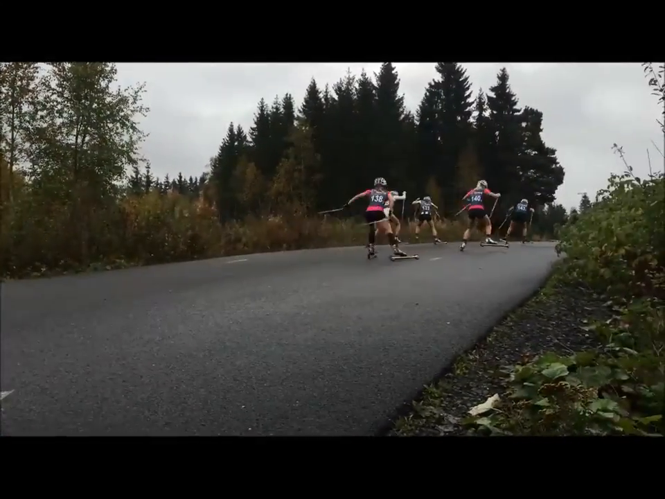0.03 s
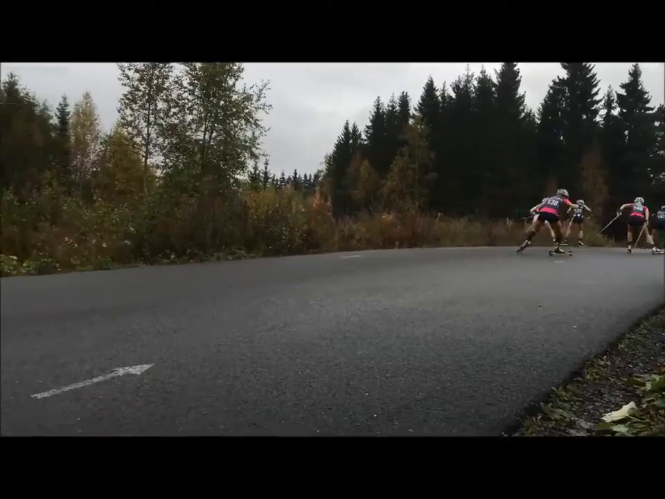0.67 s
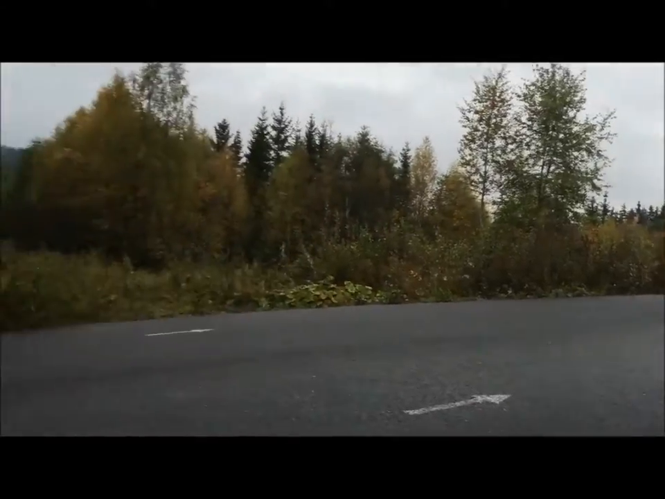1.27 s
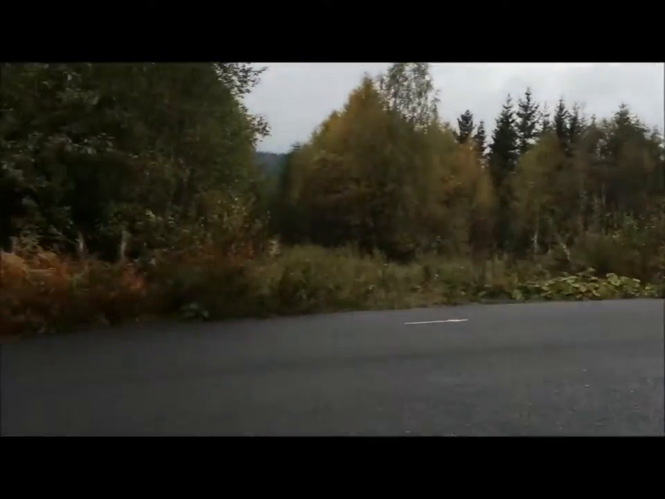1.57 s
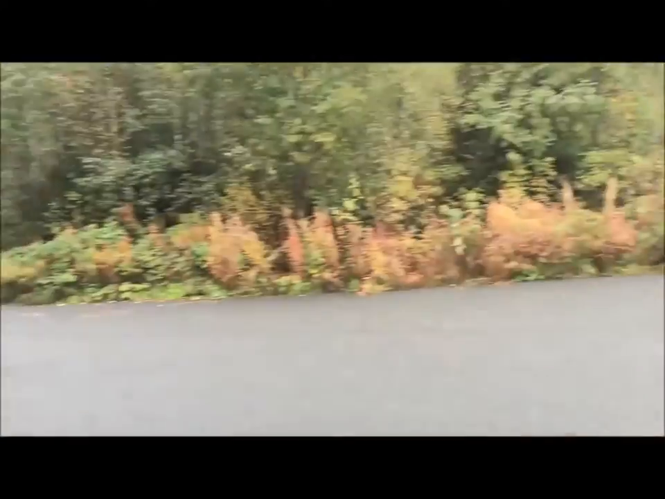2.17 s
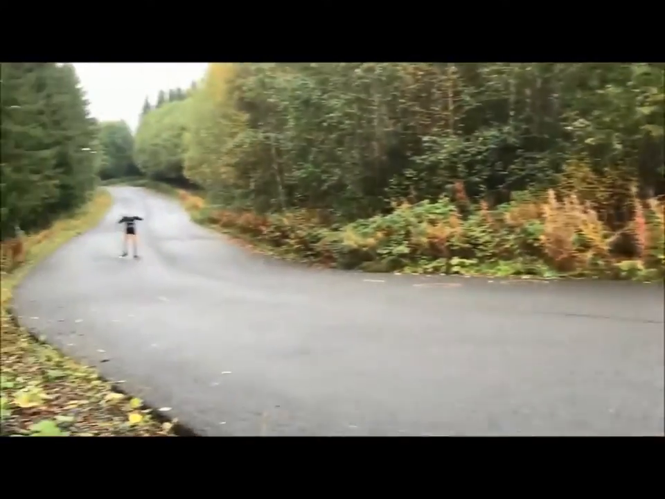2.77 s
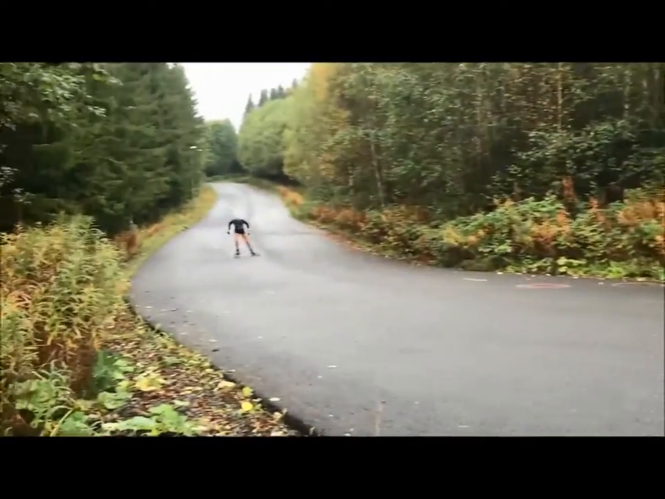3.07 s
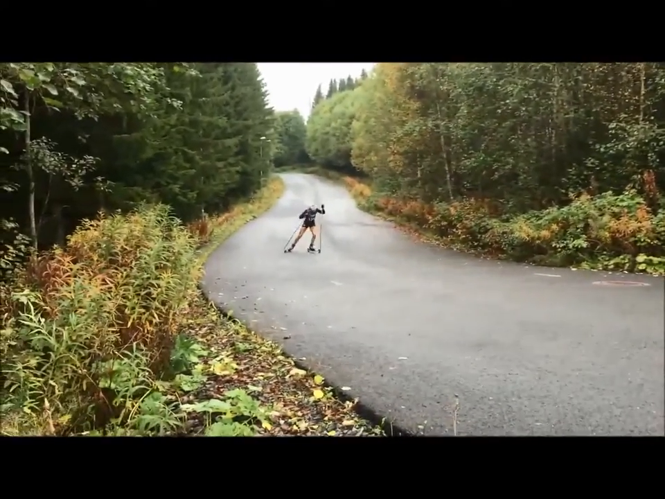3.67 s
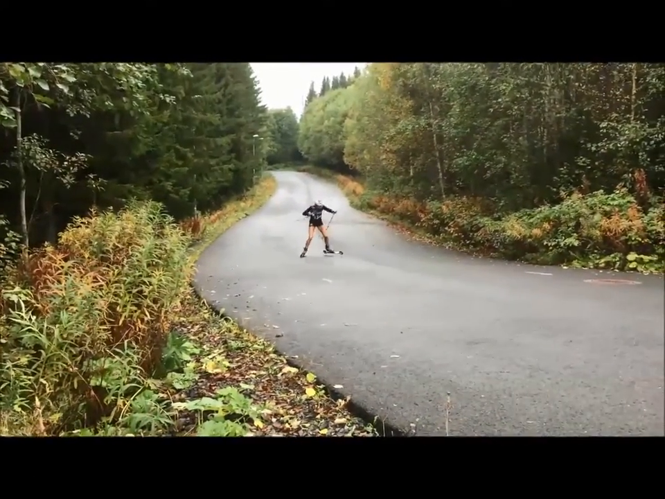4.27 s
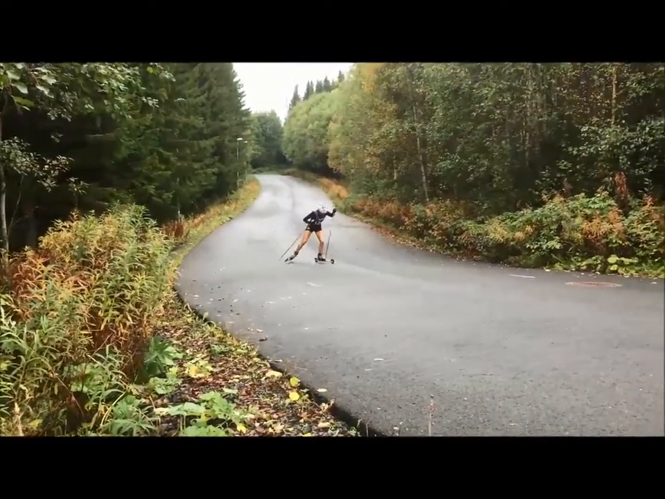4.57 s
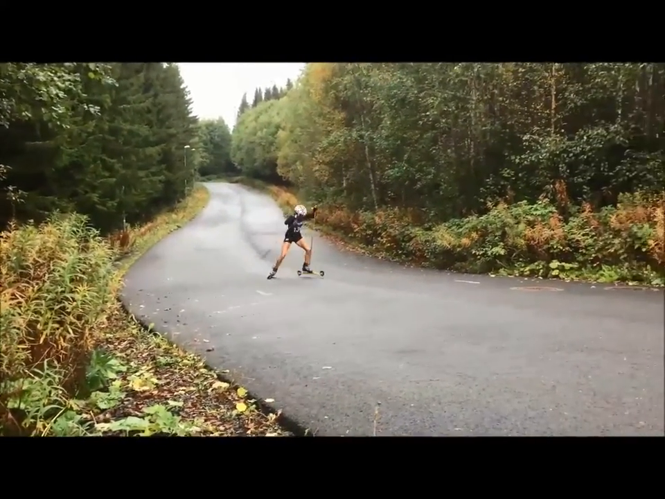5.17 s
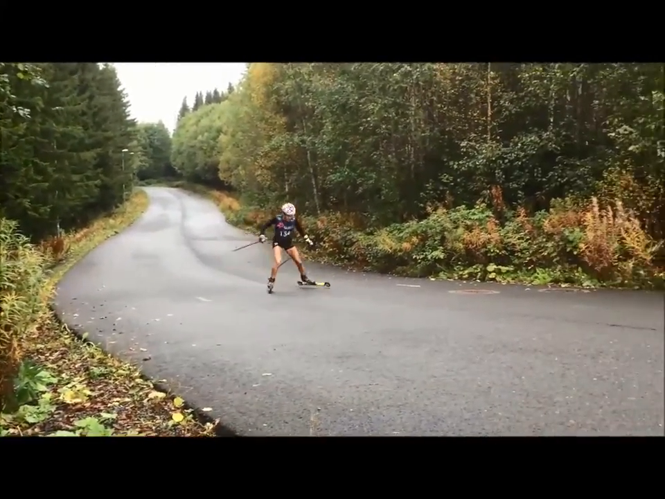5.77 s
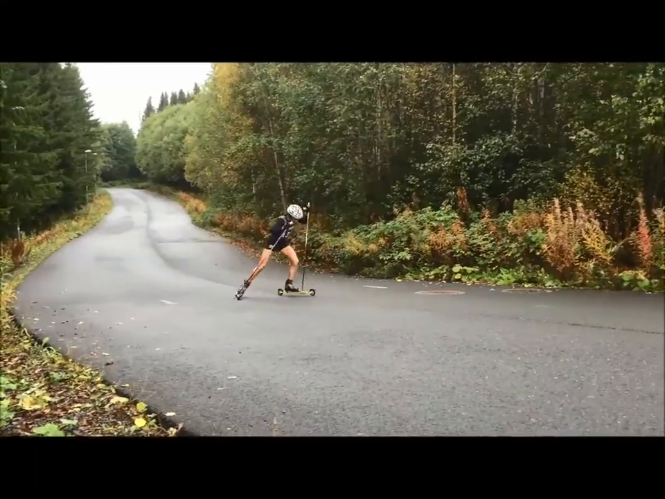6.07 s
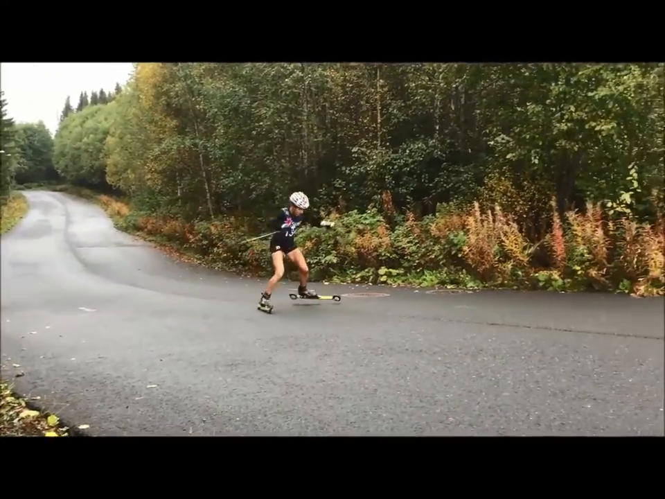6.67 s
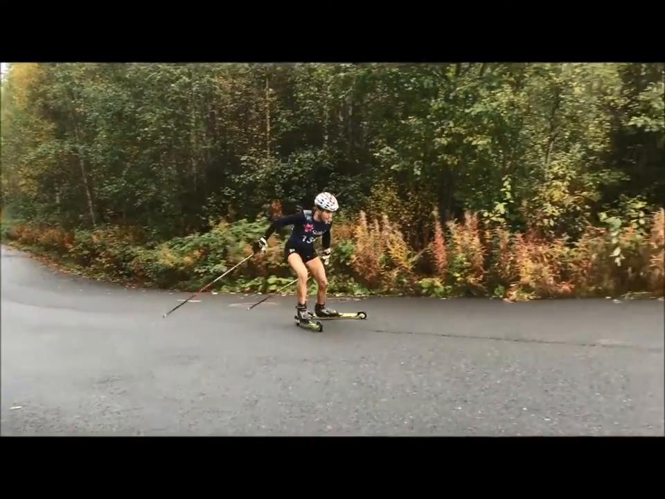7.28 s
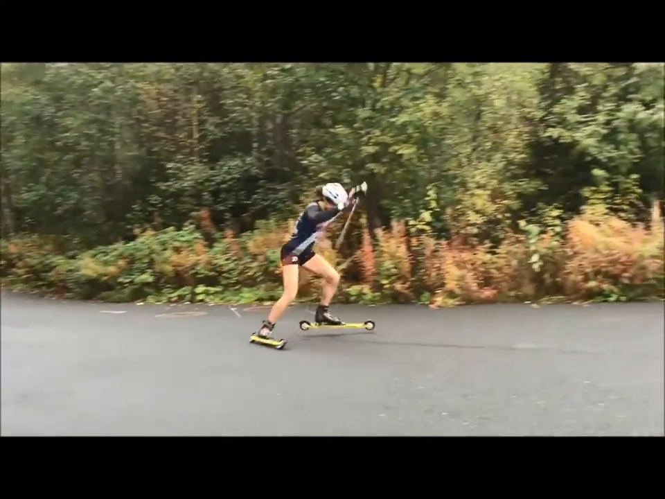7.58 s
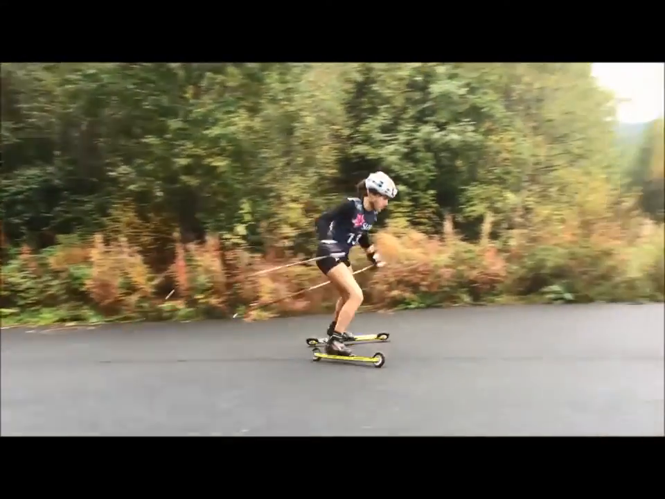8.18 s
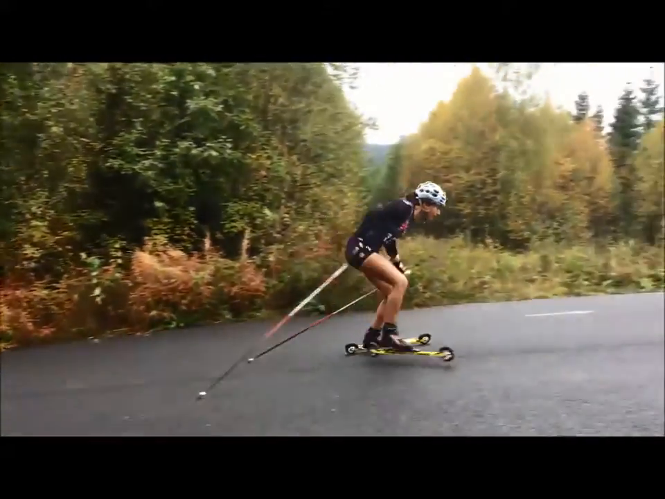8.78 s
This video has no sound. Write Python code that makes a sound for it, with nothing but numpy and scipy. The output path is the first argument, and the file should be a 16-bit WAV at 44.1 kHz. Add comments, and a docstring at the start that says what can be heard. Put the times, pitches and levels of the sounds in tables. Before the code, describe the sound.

A group of roller skiers moves away along a forest road, pole tips clicking and skis slapping in a quick, uneven clatter over the hiss of wheels. The clatter thins, and one skier approaches with evenly spaced pole strikes that echo briefly among the trees. The clicks grow loudest at the end, with short scrapes, a faint whirr and a low puff of air on the roadside microphone.

```python
"""Roller skiers on a forest road

A pack of skiers clatters away over the asphalt, then one skier comes close. Carbide pole tips bite
and skid, skis slap down between the pole plants, and rubber wheels hiss on the road.
The trees echo the clicks, and puffs of air touch the microphone now and then."""
import sys
import numpy as np
from scipy import signal
from scipy.fft import rfft, irfft, next_fast_len
from scipy.io import wavfile
from scipy.ndimage import uniform_filter1d, map_coordinates

SR = 44100
rng = np.random.default_rng(int(sys.argv[2]) if len(sys.argv) > 2 else 0)


def to_wav(s):
    """Save 16-bit WAV."""
    ch = np.atleast_2d(s).T  # columns
    pcm = np.round(np.clip(ch, -1, 1) * 32767)  # PCM
    wavfile.write(sys.argv[1], SR, pcm.astype(np.int16))


N = 393813

# Poles hitting the road. Each row: start in seconds, level in dB, knock (middle tones) in dB,
# sparkle (high tones) in dB, echo level in dB, ping pitch in Hz, knock pitch in Hz.
POLE_PLANTS = [(0.3269, -16.5, 1.5, -5, -42, 3370, 1500), (0.8374, -24.5, 11, -14, -60, 3080, 750),
               (1.0431, -21.5, -8, -2.5, -46, 2270, 1430), (1.6284, -18, -4, -4, -39.5, 3040, 674),
               (2.3335, -19.5, 3, -2.5, -34.5, 3520, 610), (3.0329, -16, -7, 2.5, -33.5, 3330, 1440),
               (3.798, -25.5, 2, 4, -33, 3190, 1400), (4.6354, -20, 3.5, -8.5, -30.5, 3080, 1460),
               (5.413, -20, 3, 4.5, -31.5, 4380, 1400), (6.2009, -21, -3.5, -2, -30, 3260, 1400),
               (7.0113, -17.5, 2, 5, -34, 3250, 1400), (7.805, -12, 4.5, 3.5, -33.5, 3140, 1224),
               (8.5958, -9, -2.5, -2.5, -35, 3840, 1160)]
# The tone of a pole tip. Each row: frequency in Hz, level in dB.
TIP_TONE = [(30, -29), (200, -32.5), (500, -12.5), (1000, -9.5), (2300, -2.5), (3900, -1), (4900, -8.5),
            (6000, -9.5), (7500, -21), (11500, -33.5), (15500, -44)]

def poles():
    """Each plant drives a hard tip into the asphalt, and the forest answers."""
    out = np.zeros(N)
    for start, db, knock_db, sparkle_db, echo_db, ping_hz, knock_hz in POLE_PLANTS:
        pings = [(ping_hz, 260, 8), (knock_hz, 140, 7)]
        click = contact(TIP_TONE, db, knock_db, sparkle_db, pings,
                        chatter_s=0.0034, chatter=2.36, scuff_s=0.00067)
        add(out, start - LEAD_S, click)
        add(out, start, amp(echo_db) * forest_echo(far_db=-9, far_stretch=2.57, lumpiness=0.13))
    return out


# Skis landing. Each row: start in seconds, level in dB, knock in dB, sparkle in dB,
# thump level in dB, ping pitch in Hz.
SKI_LANDINGS = [(0.115, -32.5, 9, 5, -52, 2220), (0.147, -37, 5, -8, -43.5, 1980),
                (0.472, -26.5, 6.5, 5, -48, 3230), (0.863, -29.5, 0, 2, -50, 2630),
                (1.433, -30, -2.5, 15, -46.5, 3640), (1.7125, -21, -10.5, 9.5, -64, 3290),
                (1.799, -35, -1, 10, -52, 2030), (2.161, -45, 18, 3, -61, 2000),
                (2.4058, -22, -7, -2, -56, 3330), (2.77, -43, 14, -5, -54, 3300),
                (2.927, -48.5, 15, 0, -55, 1990), (4.2306, -31.5, 0.5, -12, -59, 3130),
                (5.048, -29.5, 3.5, 0, -52, 3380), (5.8177, -31, 3.5, 0, -51.5, 3200),
                (6.2746, -27.5, 6.5, 10, -52, 2960), (6.633, -31, 7.5, 3, -60, 2570),
                (7.0897, -21.5, -3.5, 3, -51, 2670), (7.4532, -27.5, 9, 5.5, -44, 2080),
                (7.883, -25.5, -0.5, 2, -45, 2440), (8.2336, -23.5, 5.5, 4, -41, 3230),
                (8.6738, -24, 4, 5.5, -40, 3320)]
# The tone of a ski's slap. Each row: frequency in Hz, level in dB.
SKI_TONE = [(25, -28), (80, -12), (150, -1.5), (500, -5.5), (1100, -3), (2300, -0.5), (3700, 0.5),
            (4800, -20), (6300, -24), (8500, -40), (15000, -58)]
# The low notes of a loaded ski. Each row: pitch in Hz, level in dB, seconds to fade by 60 dB.
THUMP_NOTES = [(135.4, -2, 0.094), (161.5, -4.5, 0.21), (217.3, 4, 0.096), (290, -26, .07)]

def skis():
    """A ski lands with a slap, its frame thumps on the rubber wheels, and its binding rattles."""
    out, t = np.zeros(N), np.arange(SR // 4) / SR
    for start, db, knock_db, sparkle_db, thump_db, ping_hz in SKI_LANDINGS:
        knock_hz = rng.uniform(380, 643)
        pings = [(ping_hz, 260, 8), (knock_hz, 90, 5)]
        slap = contact(SKI_TONE, db, knock_db, sparkle_db, pings,
                       chatter_s=0.003, chatter=1.5, scuff_s=0.003)
        add(out, start - LEAD_S, slap)
        add(out, start, amp(db - 22.5) * forest_echo(far_db=-32, far_stretch=1.9, lumpiness=0.24))
        thump = np.zeros(len(t))
        for hz, note_db, fade_s in THUMP_NOTES:
            phase = 2 * np.pi * hz * rng.normal(1, 0.052) * t + rng.uniform(0, 2 * np.pi)
            thump += amp(note_db - 60 * t / fade_s) * np.sin(phase)
        thump *= 1 - np.exp(-t / 0.0053)
        add(out, start, amp(thump_db) * thump / np.std(thump[:SR // 30]))
        for delay_s in rng.uniform(0.012, 0.06, size=2):
            rattle = contact(SKI_TONE, db - 18.5, knock_db, -1, pings,
                             chatter_s=0.0034, chatter=1, scuff_s=0.00033)
            add(out, start + delay_s, rattle)
    return out


# Light taps of tips and bindings. Each row: start in seconds, level in dB, knock in dB, sparkle in dB.
LIGHT_TAPS = [(0.034, -31.5, 1, 12), (0.102, -34, 9, -2), (0.203, -38, 4, -13), (0.243, -33, 5.5, 12.5),
              (0.3134, -27, -0.5, 4), (0.392, -30.5, -5, 9), (0.409, -28.5, -1, 9), (0.457, -29.5, 4, 2),
              (0.485, -31.5, 1, 4), (0.533, -38, 18, -13), (0.6391, -34.5, -1.5, 5), (0.659, -35, 8, -10),
              (0.696, -32, 0, -6), (0.8811, -36.5, 5, 11.5), (0.9078, -32.5, 3, -6), (0.932, -33, 6, 6),
              (0.939, -26.5, -3, 14.5), (1.0103, -31.5, -2, 5), (1.098, -29.5, -0.5, 8),
              (1.135, -30.5, 0.5, -3), (1.3484, -32.5, -8, 5), (1.355, -32.5, -5, 11),
              (1.369, -31.5, -9, 12), (1.4178, -33.5, -4, -3), (1.773, -34, 9, 13), (1.879, -29, .5, 8.5),
              (1.8994, -34.5, -7, 6), (1.986, -43.5, 20, -8), (2.5, -35.5, -20, 3), (2.579, -31, -1, 0),
              (2.5976, -35.5, 5, 5), (3.742, -42.5, -0.5, 1), (3.8142, -30.5, -15, 12),
              (4.2048, -37.5, -18, -4), (4.6282, -27, -2, 4), (6.208, -24.5, 5, 14), (6.586, -40.5, -5, -1),
              (6.703, -41, 9, 11), (7.415, -38, 5.5, -7), (7.812, -21.5, -4, 9), (7.863, -27, -1, 9),
              (8.1697, -38, -2, 22), (8.188, -28.5, -3.5, 2), (8.3217, -38.5, 0.5, -3),
              (8.6, -18.5, -2, -5)]
# The tone of a tap. Each row: frequency in Hz, level in dB.
TAP_TONE = [(25, -17), (200, -3.5), (700, -2), (1200, 2), (2500, 3.5), (3800, 3), (4800, -11.5),
            (6000, -16.5), (8500, -33), (15000, -51)]

def clatter():
    """Tips and bindings tap lightly, each with its own ping, hollow knock and faint echo."""
    out = np.zeros(N)
    for start, db, knock_db, sparkle_db in LIGHT_TAPS + stray_taps():
        ping_hz = 3100 * np.exp(rng.normal(0, 0.18))
        knock_hz = rng.uniform(453, 1250)
        pings = [(ping_hz, 280, 6), (knock_hz, 100, 7)]
        tap = contact(TAP_TONE, db, knock_db, sparkle_db, pings,
                      chatter_s=0.0058, chatter=1.87, scuff_s=0.0015)
        add(out, start - LEAD_S, tap)
        add(out, start, amp(db - 20.5) * forest_echo(far_db=-33, far_stretch=1.6, lumpiness=0.092))
    return out


def stray_taps(step_s=0.02, pack_gone_s=1.65, knock_db=1.5, sparkle_db=-8):
    """Rows of faint random taps: many while the pack is near, few after it."""
    times = np.arange(0, N / SR, step_s)
    chance, scatter = rng.random(len(times)), rng.standard_normal(len(times))
    taps_per_s = np.where(times < pack_gone_s, 7, 2)
    db = at_time(GLIDE_LEVEL, times) + 4 + 2 * scatter
    return [(times[i], db[i], knock_db, sparkle_db) for i in np.flatnonzero(chance < taps_per_s * step_s)]


# Where a pole shaft rings. Each row, as for the pings: pitch in Hz, width in Hz, boost in dB.
SHAFT_RINGS = [(1760, 190, 5), (3230, 970, 6), (4400, 180, 4.5)]
LEAD_S = 0.006  # the scuff begins this long before the bite

def contact(tone, level_db, knock_db, sparkle_db, pings, chatter_s, chatter, scuff_s):
    """One hard hit: a growing scuff, a sharp bite, then chatter on the stones."""
    t = np.arange(SR // 20) / SR - LEAD_S
    pressure = np.exp(-np.abs(t) / np.where(t < 0, scuff_s, chatter_s))
    stones = pressure * rng.standard_normal(len(t)) * np.exp(0.38 * rng.standard_normal(len(t)))
    force = chatter * stones / np.linalg.norm(stones)
    force[round(LEAD_S * SR)] += 1  # the bite
    # The force's broad tone is taken out, so the struck parts set the tone and chatter only ripples it.
    broad_db = 10 * np.log10(uniform_filter1d(np.abs(rfft(force)) ** 2, size=70) + 1e-9)
    grid_hz = np.fft.rfftfreq(len(t), 1 / SR)
    tilt = [(150, 0), (550, knock_db), (1100, knock_db), (1900, 0), (4000, 0), (5800, sparkle_db)]

    def gain_db(hz):
        struck_db = at_hz(tone, hz) + ring_db(SHAFT_RINGS, hz) + ring_db(pings, hz)
        return struck_db + at_hz(tilt, hz) - np.interp(hz, grid_hz, broad_db)

    click = shape_tone(force, gain_db)
    # The click gets as much energy as 12 ms of steady sound at level_db.
    return amp(level_db) * click * np.sqrt(0.012 * SR) / np.linalg.norm(click)


# Tips and edges skidding. Each row: middle in seconds, half length in seconds, level in dB.
TIP_SKIDS = [(0.103, 0.012, -37), (0.263, 0.013, -38.5), (0.331, 0.019, -31), (0.674, .008, -38.5),
             (0.964, 0.018, -39), (1.406, .012, -36.5), (1.646, .012, -34), (1.69, 0.0085, -34),
             (4.684, 0.05, -40.5), (5.463, .023, -33), (6.248, .031, -35), (7.075, 0.022, -31),
             (7.871, 0.019, -31.5), (8.228, 0.015, -34), (8.655, 0.016, -28)]

def skids(grains_per_s=1500):
    """A loaded tip skips over grains of grit."""
    t = np.arange(N) / SR
    pressure = sum(amp(db) * np.exp(-0.5 * ((t - middle) / half) ** 2) for middle, half, db in TIP_SKIDS)
    treble_cut = [(4000, 0.5), (6000, -6)]  # subtracted below, so the highest tones come out brighter
    scrape = shape_tone(grit(grains_per_s),
                        lambda hz: at_hz(TAP_TONE, hz) + ring_db(SHAFT_RINGS, hz) - at_hz(treble_cut, hz))
    return pressure * unit(scrape)


# Skating pushes. Each row: time of full weight in seconds, seconds held, roar in dB, sizzle in dB.
SKATING_PUSHES = [(.62, .06, -45, -84), (.98, 0.043, -43, -51), (1.93, 0.047, -45.5, -73),
                  (2.5, 0.17, -43.5, -65), (3.22, 0.15, -43.5, -61), (3.92, 0.04, -46.5, -62),
                  (4.34, 0.08, -49.5, -68.5), (5.03, 0.1, -45.5, -66), (5.7, 0.19, -45.5, -67),
                  (6.33, 0.042, -45.5, -70), (6.65, 0.029, -45, -64), (7.18, 0.15, -46, -67),
                  (7.47, 0.035, -44, -74), (8, .04, -51, -69.5), (8.28, 0.052, -48.5, -72),
                  (8.74, 0.11, -48.5, -70)]
# How loud the gliding wheels and their rumble are. Each row: time in seconds, level in dB.
GLIDE_LEVEL = [(0, -43.5), (.45, -44.5), (1.25, -43.5), (1.5, -48.5), (1.8, -45.5), (2.35, -54),
               (3.7, -56.5), (4.2, -51), (6.1, -55), (7.1, -50), (8.93, -50)]
RUMBLE_LEVEL = [(0.0, -59), (0.25, -57), (3.43, -64), (6.79, -62.5), (7.19, -54), (7.68, -63),
                (8.08, -58.5), (8.45, -61.5), (8.93, -49)]
# The tones of the three wheel noises. Each row: frequency in Hz, level in dB.
ROAR_TONE = [(100, -10.5), (300, -10.5), (480, -3.5), (720, -7), (1000, -2.5), (1220, -0.5), (1450, -0.5),
             (2200, -1.5), (2700, 2), (3650, -2.5), (4300, -12), (4900, -24.5), (7000, -45.5)]
SIZZLE_TONE = [(3500, -45), (4600, 7.5), (6000, 4.5), (7500, -14), (10000, -29), (15000, -22)]
RUMBLE_TONE = [(15, -57), (28, -27), (48, -12), (75, -3.5), (105, -10), (160, -2), (210, -2.5), (290, -8.5),
               (400, -21), (800, -51.5), (2000, -100)]
# Where wheel and ski frame ring. Each row: pitch in Hz, width in Hz, boost in dB.
FRAME_RINGS = [(1730, 120, 1.5), (3393, 410, 6.5)]

def wheels():
    """Rubber rumbles on rough asphalt and loose grit ticks; each push swells a roar and a damp sizzle."""
    t = np.arange(N) / SR
    roar_power, sizzle_gain = amp(at_time(GLIDE_LEVEL, t)) ** 2, np.zeros(N)
    for full_s, hold_s, roar_db, sizzle_db in SKATING_PUSHES:
        weight = ski_load(full_s, hold_s)
        roar_power += (amp(roar_db) * weight) ** 2
        sizzle_gain += amp(sizzle_db) * weight ** 2.9
    roar_gain, bumps = np.sqrt(roar_power), wobble(90)
    roar = roar_gain * amp(1.05 * bumps) * rush(ROAR_TONE, patchy_db=3.0, rings=FRAME_RINGS)
    sizzle = sizzle_gain * amp(bumps) * rush(SIZZLE_TONE, patchy_db=3.5)
    rumble_db = at_time(RUMBLE_LEVEL, t) + 1.4 * bumps + 4.0 * wobble(20)
    rumble = amp(rumble_db) * rush(RUMBLE_TONE, patchy_db=3.5)
    stones = shape_tone(grit(grains_per_s=70), lambda hz: at_hz(SKI_TONE, hz))
    ticks = roar_gain * amp(-17.5) * unit(stones)
    return roar + sizzle + rumble + ticks


def ski_load(full_s, hold_s, rise_s=0.078, fall_db_per_s=42):
    """The weight on a ski, from 0 to 1: it comes on quickly, holds, then leaves slowly."""
    t = np.arange(N) / SR - full_s
    rise = np.exp(-(np.minimum(t, 0) / rise_s) ** 2)
    return rise * amp(-fall_db_per_s * np.maximum(t - hold_s, 0))


# The whirr grows as the lone skier nears. Each row: time in seconds, level in dB.
WHIRR_LEVEL = [(3.2, -81), (4.8, -57), (6.35, -48), (7.2, -57), (8, -46), (8.93, -52)]
# The tone of the whirr. Each row: frequency in Hz, level in dB.
WHIRR_TONE = [(900, -100), (1500, -27), (1790, -4), (1920, -2), (2030, -11), (2350, -31), (3500, -100)]

def whirr(delay_s=0.14):
    """The near skier's gear whirrs in one narrow band after each pole plant."""
    effort = sum(ski_load(start + delay_s, hold_s=0.04) for start, *_ in POLE_PLANTS) ** 1.3
    level_db = at_time(WHIRR_LEVEL, np.arange(N) / SR)
    return effort * amp(level_db + wobble(99)) * rush(WHIRR_TONE, patchy_db=3.0)


# The tone of the echo. Each row: frequency in Hz, level in dB.
ECHO_TONE = [(60, -26), (400, -11), (1000, -9), (1900, -4), (2400, -5), (3700, -3), (4800, -13.5),
             (6000, -12.5), (8500, -27), (15000, -45)]
# How long the near echo lasts. Each row: frequency in Hz, seconds to fade by 60 dB.
ECHO_FADE = [(200, 0.12), (1500, 0.31), (3300, 0.36), (6000, 0.23), (11000, 0.13)]

def forest_echo(far_db, far_stretch, lumpiness):
    """Sound scatters off near trunks, and a longer tail comes from deep in the wood."""
    freqs, times, spectrum = signal.stft(rng.standard_normal(SR), SR, nperseg=256)
    fade_s = at_hz(ECHO_FADE, freqs)[:, None]
    near = amp(-60 * times / fade_s)
    far = amp(far_db - 60 * times / (fade_s * far_stretch))
    tail = signal.istft(spectrum * (near + far), SR, nperseg=256)[1][:SR]
    t = np.arange(len(tail)) / SR
    trunks = np.exp(lumpiness * unit(uniform_filter1d(rng.standard_normal(len(t)), size=90)))
    onset = 1 - np.exp(-t / 0.0098)
    echo = shape_tone(tail * trunks * onset, lambda hz: at_hz(ECHO_TONE, hz) + ring_db(SHAFT_RINGS, hz))
    return echo / np.std(echo[:SR // 20])


# Puffs of air. Each row: middle in seconds, half length in seconds, level in dB.
AIR_PUFFS = [(.265, 0.028, -46), (.482, .015, -53), (1.677, 0.019, -47), (1.803, 0.014, -50),
             (1.946, .02, -51), (4.018, .015, -52), (5.103, .02, -51), (7.218, .018, -51),
             (8.81, 0.04, -39)]
# The tones of the puffs and the hiss. Each row: frequency in Hz, level in dB.
PUFF_TONE = [(15, -36), (35, -13), (55, -2), (95, -0.5), (150, -8), (240, -26), (700, -90)]
HISS_TONE = [(25, -23), (100, 3), (1000, 5), (6000, 7.5), (9500, 4), (10400, -3), (11500, 1.5), (16000, -4)]

def air():
    """Low puffs on the microphone, strongest as the skier sweeps by, over a faint steady hiss."""
    t = np.arange(N) / SR
    swell = sum(amp(db) * np.exp(-((t - middle) / half) ** 2) for middle, half, db in AIR_PUFFS)
    return swell * rush(PUFF_TONE, patchy_db=0.5) + amp(-74) * rush(HISS_TONE, patchy_db=2.5)


def amp(db):
    """Turn decibels into a gain."""
    return 10 ** (np.asarray(db) / 20)


def unit(x):
    """Scale a sound to an average (rms) level of 1."""
    return x / np.sqrt(np.mean(x ** 2) + 1e-20)


def at_time(points, t):
    """Read between rows of seconds and value."""
    return np.interp(t, *np.transpose(points))


def at_hz(points, hz):
    """Read between rows of Hz and value, on a log frequency scale."""
    freqs, values = np.transpose(points)
    return np.interp(np.log(hz + 1), np.log(freqs + 1), values)


def ring_db(rings, hz):
    """The boost in dB that ringing parts give near their pitches."""
    return sum(db / (1 + (2 * (hz - centre) / width) ** 2) for centre, width, db in rings)


def add(track, start_s, sound):
    """Mix a sound into a track."""
    first = max(0, round(start_s * SR))
    part = track[first:first + len(sound)]
    part += sound[:len(part)]


def grit(grains_per_s):
    """Tiny clicks of random size at random moments."""
    return rng.standard_normal(N) * (rng.random(N) < grains_per_s / SR)


def wobble(rate):
    """A smooth curve through `rate` random points a second."""
    return map_coordinates(rng.standard_normal(int(N * rate / SR) + 4), [np.arange(N) * rate / SR])


def shape_tone(x, gain_db):
    """Filter by gain_db(hz), with no ringing ahead of a hit (minimum phase)."""
    size = 2 * next_fast_len(len(x) // 2 + 2048)
    cepstrum = irfft(np.log(amp(gain_db(np.fft.rfftfreq(size, 1 / SR)))), size)
    cepstrum[1:size // 2] *= 2
    cepstrum[size // 2 + 1:] = 0
    return irfft(rfft(x, size) * np.exp(rfft(cepstrum)), size)[:len(x)]


def rush(tone, patchy_db, rings=()):
    """Rushing noise with random louder and softer patches in time and pitch."""
    spectrum = signal.stft(rng.standard_normal(N), nperseg=512)[2]
    patches = uniform_filter1d(rng.standard_normal(spectrum.shape), size=5, axis=0)
    patches = uniform_filter1d(patches, size=7, axis=1)
    noise = signal.istft(spectrum * amp(patchy_db * unit(patches)), nperseg=512)[1][:N]
    return unit(shape_tone(noise, lambda hz: at_hz(tone, hz) + ring_db(rings, hz)))


def scene():
    """Everything heard at the roadside, in one channel."""
    return (poles() + skis() + clatter() + skids() + wheels() + whirr() + air())[None]


def record(dry):
    """The nearest pole plants overload the microphone; nothing above 16100 Hz gets through."""
    squashed = dry / (1 + np.abs(dry) ** 6) ** (1 / 6)
    size = next_fast_len(N + SR // 2)
    passband = np.fft.rfftfreq(size, 1 / SR) < 16100
    return irfft(rfft(squashed, size) * passband, size)[..., :N]


dry = scene()
out = record(dry)
to_wav(out)
```